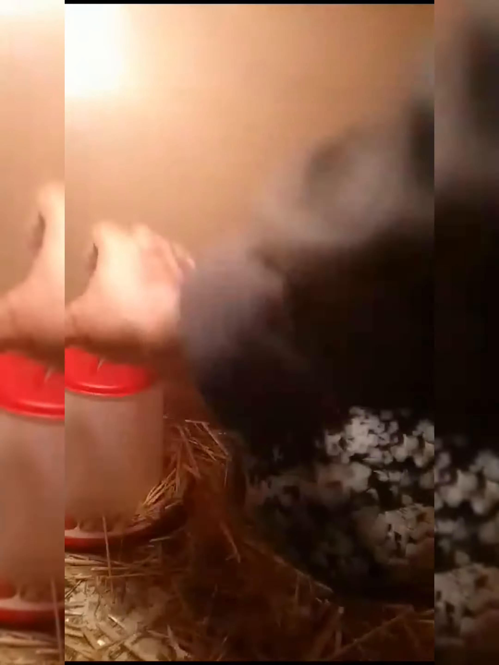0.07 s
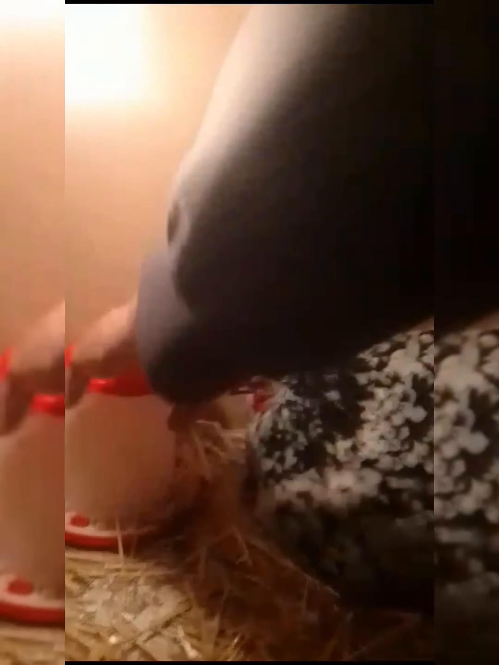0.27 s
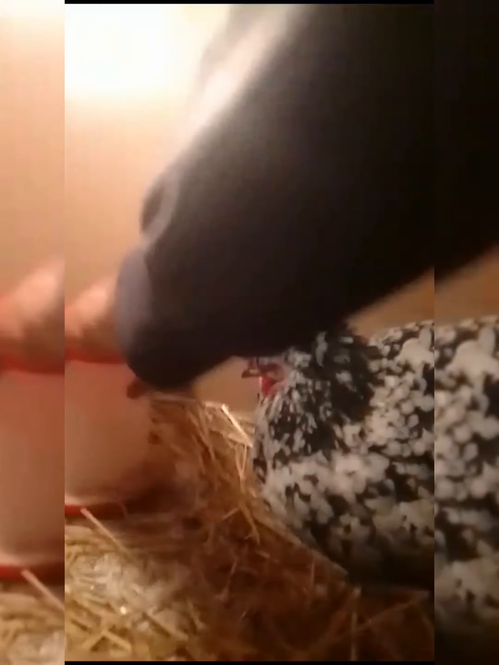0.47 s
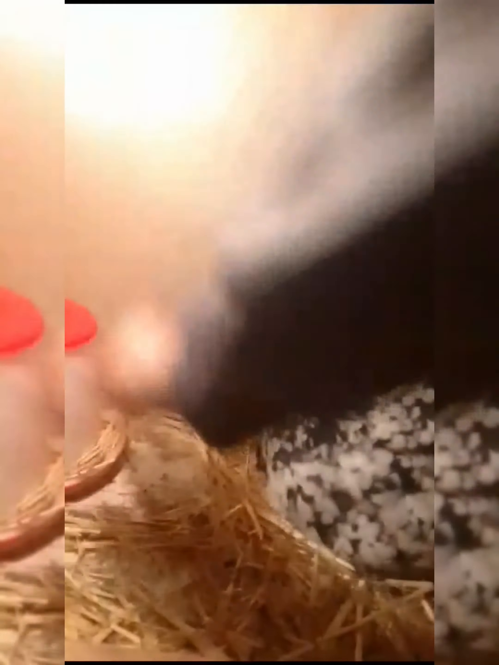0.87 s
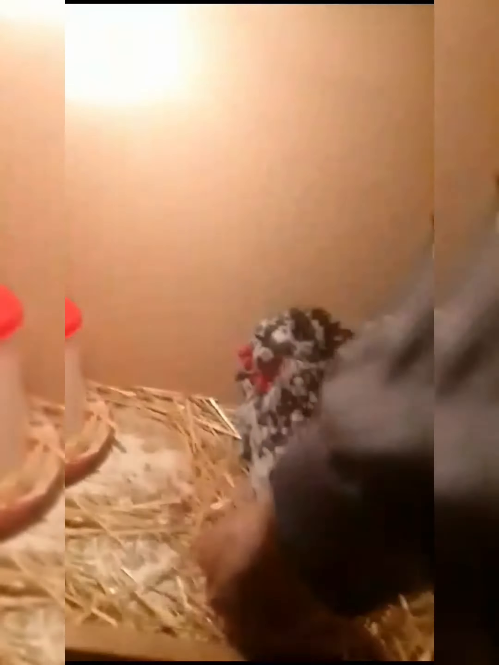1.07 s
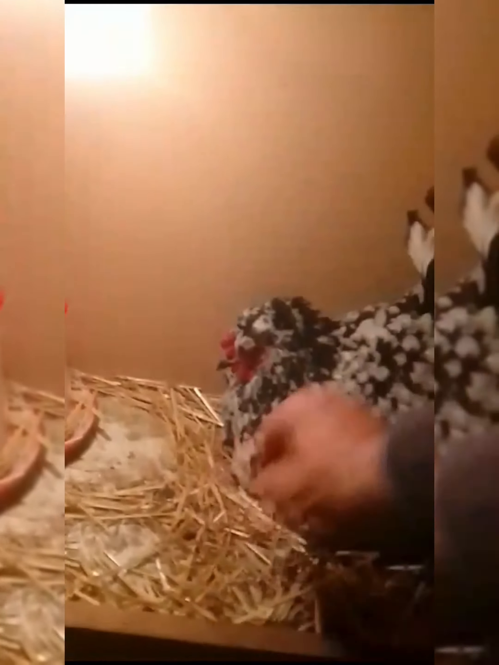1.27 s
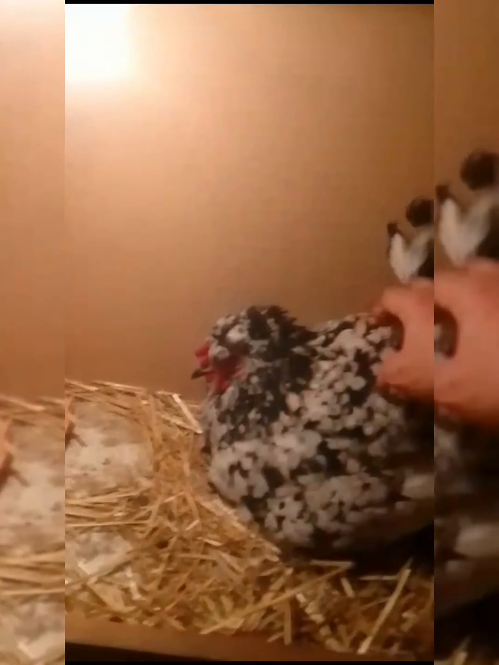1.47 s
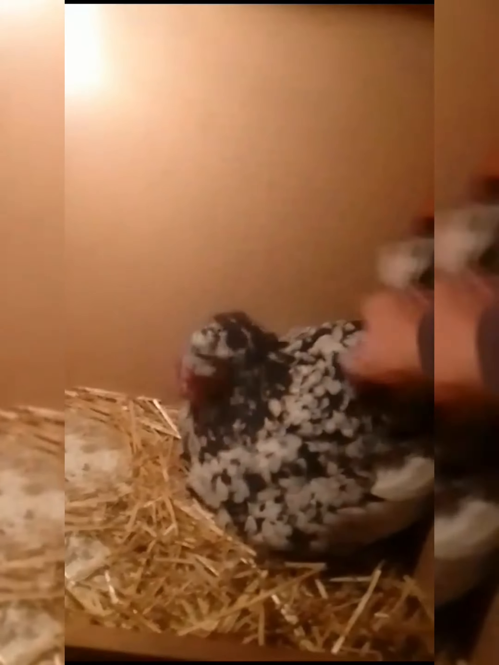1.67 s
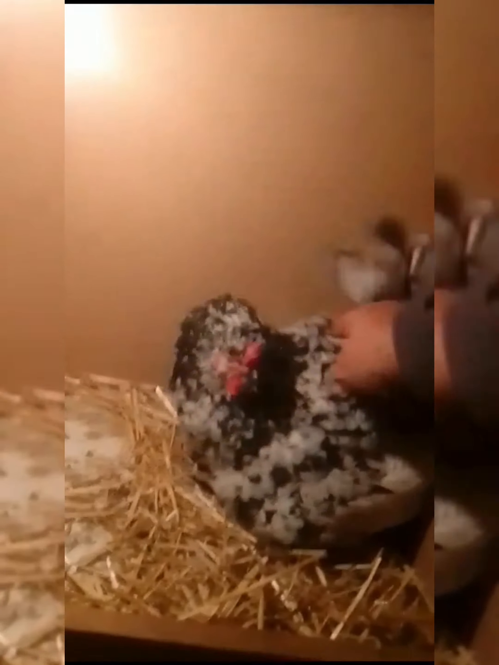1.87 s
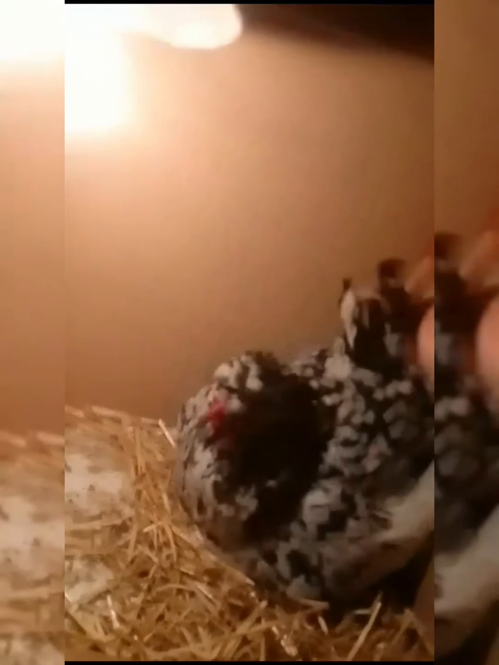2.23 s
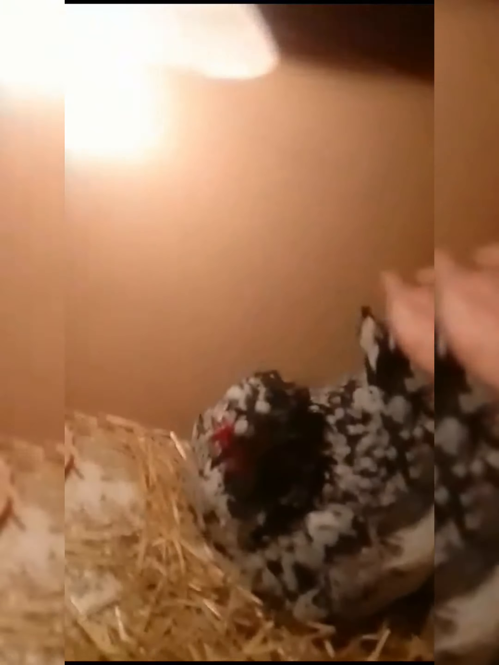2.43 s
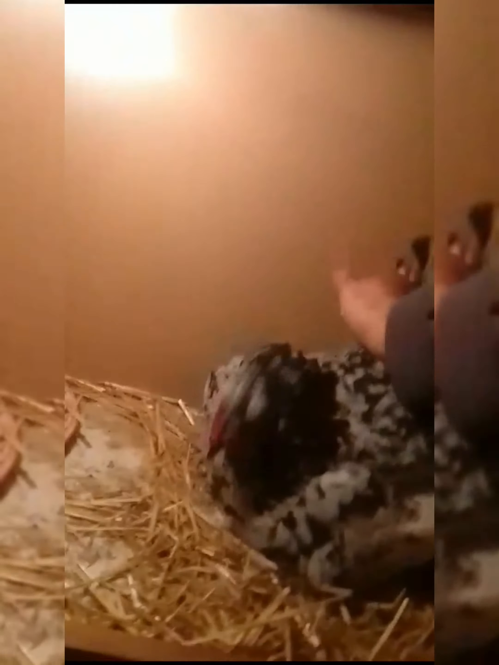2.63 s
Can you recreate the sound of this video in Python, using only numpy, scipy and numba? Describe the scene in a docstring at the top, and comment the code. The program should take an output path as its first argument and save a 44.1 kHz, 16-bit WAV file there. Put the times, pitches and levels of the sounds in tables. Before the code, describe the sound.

A hen gives two rattling growls and short, low clucks as a hand rustles and snaps the straw in her box. A sleeve rubs, a chick peeps faintly and something bumps the box, heard close in a quiet room.

```python
"""A broody hen growls at a hand in her straw-lined box: two rattling protests and short, low clucks,
made by pulses of her syrinx ringing her throat. Straw and feathers rustle under a rubbing sleeve,
stalks snap, a chick peeps twice and something bumps the box; the hen ends on two faint whines.
The box stands in a quiet room, heard close by through one small microphone."""
import sys
import numpy as np
from scipy import signal
from scipy.io import wavfile
from scipy.ndimage import uniform_filter1d
from numba import njit

SR = 44100
rng = np.random.default_rng(int(sys.argv[2]) if len(sys.argv) > 2 else 0)


def dump(signal):
    """Clip the signal to [-1, 1] and save it as 16-bit WAV at the path in sys.argv[1]."""
    limited = np.clip(np.atleast_2d(signal).T, -1, 1)
    pcm = np.round(limited * 32767).astype(np.int16)
    wavfile.write(sys.argv[1], SR, pcm)


N = 123479
T = np.arange(N) / SR
GROWL_BREATH = 0.67  # air noise relative to the syrinx pulses
# Spectrum of dry straw, rustling or cracking: frequency_hz, level_db
STRAW_SPECTRUM = [(1500, -22), (2500, -6), (4000, 12), (5200, -8), (6500, 13.5), (8000, -5), (10000, 12.5),
                  (13000, -18), (16000, -5)]


def from_db(db):
    """Decibels to gain."""
    return 10 ** (np.asarray(db) / 20)


def rms_one(x):
    """Scale to unit rms."""
    return x / np.sqrt(np.mean(x ** 2) + 1e-20)


def even(x):
    """Hold the rms at 1 over about one rattle (20 ms)."""
    return x / np.sqrt(uniform_filter1d(x ** 2, size=900) + 1e-12)


def in_time(rows):
    """Interpolate rows of (time_s, values...) to one curve per value."""
    times, *columns = np.transpose(rows)
    return [np.interp(T, times, column) for column in columns]


def arch(start_s, length_s):
    """Progress through a note from 0 to 1, and its rounded envelope."""
    progress = np.clip((T - start_s) / length_s, 0, 1)
    return progress, np.sqrt(4 * progress * (1 - progress))


def decay(age_s, t60_s):
    """Fall by 60 dB every t60_s."""
    return np.exp(-np.log(1000) * age_s / t60_s)


def drift(rate_hz):
    """Smooth random wander of rms 1, mostly slower than rate_hz."""
    step, settle = 40, 2000
    pole = np.exp(-2 * np.pi * rate_hz * step / SR)
    draws = rng.standard_normal(N // step + settle + 2)
    slow = signal.lfilter([1], [1, -2 * pole, pole * pole], draws)[settle:]
    return np.interp(np.arange(N) / step, np.arange(len(slow)), rms_one(slow))


def cut(x, hz, kind, order=2):
    """Butterworth filter."""
    return signal.sosfilt(signal.butter(order, hz, kind, fs=SR, output="sos"), x + 1e-18)


def resonate(x, hz, width_hz):
    """A resonance with gain 1 at its peak."""
    r = np.exp(-np.pi * width_hz / SR)
    feedback = [1, -2 * r * np.cos(2 * np.pi * hz / SR), r * r]
    return signal.lfilter(np.array([1, 0, -1]) * (1 - r * r) / 2, feedback, x + 1e-18)


@njit
def glide(x, hz, width_hz):
    """A resonance whose centre moves."""
    out, state = np.zeros(len(x)), 0j
    for i in range(len(x)):
        state = state * np.exp((2j * hz[i] - width_hz) * np.pi / SR) + x[i]
        out[i] = state.real
    return out


def formant(x, hz, width_hz):
    """A steep-sided throat resonance, still or moving, held at an even level."""
    ring = glide if np.ndim(hz) else resonate
    return even(ring(ring(x, hz, float(width_hz)), hz, 2.0 * width_hz))


def noise_band(hz, width_hz):
    """Steep-sided noise around one frequency; rms 1."""
    return rms_one(resonate(resonate(rng.standard_normal(N), hz, width_hz), hz, 2 * width_hz))


def white_pair():
    """Two unrelated white noises."""
    return rng.standard_normal((2, N))


def coloured(noises, spectrum, flicker_db=1.2):
    """Two noises dealt in turn to half-octave bands, each flickering around its level; rms 1."""
    out, edges_hz = 0, 31 * 2 ** np.arange(0, 9.1, .5)
    hz, db = np.transpose(spectrum)
    for k, (low, high) in enumerate(zip(edges_hz, edges_hz[1:])):
        band_db = np.interp(np.log(low * high) / 2, np.log(hz), db, left=-60)
        out += from_db(band_db + flicker_db * drift(22.4)) * cut(noises[k % 2], [low, high], "band")
    return rms_one(out)


def clicks(cycles):
    """One click per completed cycle."""
    return np.diff(np.floor(cycles), prepend=np.floor(cycles[0]))


def syrinx(pitch_hz=329.4, jitter=.3):
    """Ragged fast pulses of the hen's voice; rms 1."""
    return rms_one(clicks(np.cumsum(pitch_hz * np.exp(jitter * drift(200))) / SR))


def rattle(pulses, cycles, leak):
    """The rattle opens and closes on pulses and breath, letting some leak past when shut."""
    gate = leak + (1 + np.cos(2 * np.pi * cycles)) / 2
    return gate * (pulses + GROWL_BREATH * rng.standard_normal(N))


def growl(curve, timbre):
    """Low resonances sound as the rattle opens, upper ones half a cycle later."""
    # Harsh upper resonances: centre_hz, width_hz, level_db
    rasp_bands = [(1730, 280, 7.5), (2080, 210, -4.5), (2870, 130, 0.5), (4230, 610, 2), (4750, 67, -12.5),
                  (6860, 570, 4), (7960, 400, 4)]
    level_db, upper_hz, chest_db, rasp_db = in_time(curve)
    rattle_hz, low_hz, low_db, middle_hz, middle_db, jitter, leak, treble_db = timbre
    cycles = np.cumsum(rattle_hz * np.exp(jitter * drift(36.6))) / SR
    pulses = syrinx()
    opening = rattle(pulses, cycles, leak)
    closing = rattle(pulses, cycles + .5, leak)
    airy = rattle(.15 * pulses, cycles + .5, leak)
    low_loss_db = 0.58 * np.maximum(upper_hz - 844, 0)  # the lows thin out as the beak opens
    voice = (from_db(chest_db) * formant(opening, hz=227, width_hz=33)
             + from_db(low_db - low_loss_db) * formant(opening, low_hz, width_hz=120)
             + from_db(middle_db) * formant(closing, middle_hz, width_hz=150)
             + formant(closing, upper_hz, width_hz=150)
             + from_db(-12.5) * formant(closing, 1.224 * upper_hz, width_hz=116))  # beak
    rasp = sum(from_db(db + treble_db * (hz > 5500)) * formant(airy, hz, width)
               for hz, width, db in rasp_bands)
    voice = even(cut(voice, 1350, "low", order=6)) + from_db(rasp_db) * rms_one(rasp)
    sounding = (T > curve[0][0]) & (T < curve[-1][0])
    return voice * from_db(level_db) * uniform_filter1d(1.0 * sounding, size=300)


def growls():
    """The hen protests twice, the first time in two stretches with a short gap."""
    # One curve per stretch: time_s, level_db, upper_resonance_hz, chest_db, rasp_db
    curves = [
        [(.16, -49.5, 830, -3, -30), (.232, -57, 830, 2, -16), (.252, -30.5, 846, -21, -26),
         (.262, -49, 830, -20, -12), (.272, -32.5, 858, -13, -20), (.335, -36.5, 860, -2, -15),
         (.375, -31, 843, -8.5, -14), (.45, -30, 853, -24, -16), (.575, -32.5, 823, 5, -11.5),
         (.625, -48.5, 806, 10, -24)],
        [(.70, -49.5, 820, -11, -16), (.745, -36, 806, 0, -22), (.785, -46.5, 776, 12, -23)],
        [(1.655, -49.5, 840, -13, -22), (1.688, -48, 830, -29, -19), (1.75, -41, 785, 5, -15.5),
         (1.785, -35, 793, -1.5, -23.5), (1.88, -35.5, 806, -4.5, -20.5), (1.955, -34, 820, -31, -19.5),
         (1.98, -30, 786, -30, -14), (2.007, -35.5, 855, -21, -20), (2.013, -34, 800, -13, -7),
         (2.038, -27, 854, -30, -15), (2.06, -35, 1050, -17, -13), (2.078, -59, 1090, -10, -12)],
    ]
    # The throat in each stretch: rattle_hz, low_hz, low_db, middle_hz, middle_db,
    # jitter_ratio, leak_ratio, rasp_treble_db
    timbres = [(53.99, 452, 4.5, 610, 6, 0.079, 0.23, 4), (56, 470, 3.5, 560, -5, 0.079, 0.36, 0),
               (53.28, 400, -1.5, 701, -11.5, 0.135, 0.52, -2)]
    return sum(growl(curve, timbre) for curve, timbre in zip(curves, timbres))


def clucks(attack_s=0.0036, release_s=0.019, sag=0.27, jitter=0.067, breath=0.55):
    """A few pulses sagging in pitch ring the throat over a round chest note; the beak hisses thinly."""
    # Each cluck: start_s, length_s, level_db, pitch_hz, hiss_db, mouth_hz, brightness_db
    calls = [(0.204, 0.026, -29.5, 252.5, -33.5, 583, -2), (0.302, 0.013, -24, 265.4, -24.5, 587, -7),
             (0.921, 0.014, -34.5, 260, -30, 533, -1), (0.946, 0.0193, -29, 245.9, -20, 547, 6.5),
             (1.354, 0.026, -31, 242.6, -22.5, 487, -0.5), (1.679, 0.0093, -37, 270, -32, 530, -5),
             (1.708, 0.022, -30.5, 240.5, -24.5, 543, 2), (2.499, 0.012, -40.5, 254.3, -19, 850.4, 1.5)]
    # Throat resonances: centre_hz, width_hz, level_db
    throat = [(214, 57, 6), (380, 58, 7), (670, 66, 4.5), (848.6, 36, 4.5), (1093, 32, -3),
              (1229, 31, -3.5)]
    # Hiss at the beak: centre_hz, width_hz, level_db
    hiss_bands = [(4650, 250, 12.4), (6290, 53, 22.2), (7750, 160, 9.7)]
    out = np.zeros(N)
    for start_s, length_s, level_db, pitch_hz, hiss_db, mouth_hz, bright_db in calls:
        age = T - start_s
        push = np.clip(age / attack_s, 0, 1) * np.clip((length_s - age) / release_s + .5, 0, 1)
        progress = np.clip(age / length_s, 0, 1)
        pitch = pitch_hz * np.exp(jitter * drift(190) - sag * (progress - .5))
        cycles = np.cumsum(pitch * (age > 0)) / SR + .5
        pulses = (clicks(cycles) + breath * np.sqrt(pitch_hz / SR) * rng.standard_normal(N)) * push
        tract = sorted([*throat, (mouth_hz, 102, 7)])
        ringing = sum((-1) ** k * from_db(db + bright_db * (hz > 780)) * resonate(pulses, hz, width)
                      for k, (hz, width, db) in enumerate(tract))
        chest = from_db(-9) * rms_one(push * np.cos(2 * np.pi * cycles))
        voice = rms_one(cut(ringing, 1470, "low", order=4)) + chest
        voice = rms_one(cut(voice, 218, "high", order=4))
        air = push * rng.standard_normal(N)
        hiss = sum(from_db(db) * resonate(air, hz, width) for hz, width, db in hiss_bands)
        hiss = from_db(hiss_db) * rms_one(cut(hiss, 2500, "high"))
        gain = from_db(level_db) * np.sqrt(length_s / T[-1])  # level over the cluck's own length
        out += gain * (voice + hiss)
    return out


def whines(width_hz=180):
    """Faint husky notes through a closed beak."""
    # Each whine: start_s, length_s, level_db, pitch_hz
    notes = [(2.636, 0.034, -49.5, 804), (2.768, 0.059, -46.5, 790)]
    out = np.zeros(N)
    for start_s, length_s, level_db, hz in notes:
        husk = resonate(resonate(rng.standard_normal(N), hz, width_hz), hz, width_hz)
        out += from_db(level_db) * arch(start_s, length_s)[1] * even(husk)
    return out


def chick(sag=.1, jitter=.007, quaver_db=2.5, swell_db=1):
    """Each peep sags in pitch, then sweeps upward, quavering and losing its overtone."""
    # Each peep: start_s, length_s, level_db, pitch_hz, rise_ratio, turn_fraction
    peeps = [(0.951, 0.079, -43, 3014, 1.48, .62), (2.208, .05, -42, 2695, 1.55, 0.5)]
    out = np.zeros(N)
    for start_s, length_s, level_db, pitch_hz, rise, turn in peeps:
        progress, envelope = arch(start_s, length_s)
        risen = 1 / (1 + np.exp((turn - progress) / 0.06))
        pitch = pitch_hz * rise ** risen * (1 + sag * (1 - progress) ** 4)
        phase = 2 * np.pi * np.cumsum(pitch * (1 + jitter * drift(330))) / SR
        octave = from_db(-3.5 - 7 * risen ** 4 + quaver_db * drift(150)) * np.sin(2 * phase)
        tone = from_db(quaver_db * drift(150)) * np.sin(phase)
        out += from_db(level_db + swell_db * (progress - .5)) * envelope ** 2 * (tone + octave)
    return out


def snaps(knock_t60_s=0.045):
    """A bright crack and a woody knock for each breaking stalk."""
    # Each stalk: start_s, crack_db, knock_db, knock_hz, crack_t60_s
    stalks = [(0.308, -41.5, -42, 2290, 0.044), (.375, -36, -37.5, 2660, .04),
              (0.455, -37, -55, 2010, 0.045), (0.577, -34.5, -44, 1800, 0.042),
              (0.812, -38, -51, 1700, .04), (0.8952, -45, -47, 1670, .025),
              (1.0372, -37.5, -42.5, 1470, 0.038), (1.067, -33, -68, 2000, 0.012),
              (1.177, -58, -45.5, 1180, .035), (1.325, -70, -46.5, 633, .035),
              (1.51, -33.5, -38, 1250, 0.038), (1.602, -45, -63, 2000, .02), (1.658, -77, -47, 1310, .035),
              (1.794, -53, -40.5, 2060, .035), (2.094, -35, -68, 1990, 0.014),
              (2.099, -33, -32, 1570, 0.03), (2.4066, -46, -42.5, 1400, 0.042),
              (2.493, -51, -45.5, 2070, .035), (2.51, -39, -56, 1280, 0.034)]
    out, crackle = np.zeros(N), coloured(white_pair(), STRAW_SPECTRUM)
    for start_s, crack_db, knock_db, knock_hz, crack_t60_s in stalks:
        age = np.clip(T - start_s, 0, .3)
        crack = from_db(crack_db) * crackle * decay(age, crack_t60_s)
        knock = from_db(knock_db) * noise_band(knock_hz, width_hz=470) * decay(age, knock_t60_s)
        out += (T > start_s) * (crack + knock)
    return out


def bump(start_s=2.227, contact_s=0.00049, gain_db=-30):
    """A soft blow sets the box's panels ringing."""
    # Panel modes: frequency_hz, level_db, t60_s
    modes = [(128, -7.5, 0.33), (180, 1.5, 0.12), (240, 3.5, 0.12), (359, -2.5, 0.062), (533, -16, 0.11),
             (823, -15.5, 0.17), (1080, -16, 0.1)]
    age = np.maximum(T - start_s, 0)
    ringing = sum(from_db(db) * decay(age, t60) * np.sin(2 * np.pi * hz * age) for hz, db, t60 in modes)
    onset = 1 - np.exp(-age / contact_s)
    return from_db(gain_db) * cut(onset * ringing, 116, "high", order=4)


def straw(cracks_per_s=1100, spread_db=3, clump_db=.8):
    """Dense tiny cracks over the hiss of sliding straw and feathers; a quick sweep is crisper."""
    # Strength of the rustle: time_s, level_db
    rustle_curve = [(0, -53), (.07, -84), (.19, -74), (.29, -61.5), (.36, -53), (.465, -39.5),
                    (.505, -45.5), (.565, -39.5), (.61, -42), (.68, -44), (.735, -40), (.795, -53),
                    (.82, -43), (.93, -62), (1.03, -58.5), (1.075, -51), (1.11, -50), (1.2, -59.5),
                    (1.32, -73), (1.43, -78), (1.47, -57.5), (1.5, -60.5), (1.54, -53.5), (1.64, -60.5),
                    (1.74, -63), (1.81, -50), (2.0, -54), (2.13, -47.5), (2.195, -46.5), (2.235, -39),
                    (2.3, -48), (2.37, -56), (2.47, -64), (2.53, -50.5), (2.65, -54), (2.8, -52.5)]
    # The hand sweeping through dry stalks: start_s, length_s, level_db
    sweeps = [(1.031, 0.115, -45)]
    # Spectrum of the sweep: frequency_hz, level_db
    sweep_spectrum = [(5000, -35), (8000, 0), (11000, 11), (15000, -10)]
    sizes = from_db(spread_db * np.minimum(rng.exponential(1, (2, N)), 5)) * np.sign(white_pair())
    cracks = rms_one(sizes * (rng.random((2, N)) < cracks_per_s / SR))
    friction = cracks + white_pair()
    rustle_db = in_time(rustle_curve)[0] + clump_db * drift(110)
    rustle = from_db(rustle_db) * coloured(friction, STRAW_SPECTRUM)
    sweep_gain = sum(from_db(db) * arch(start, length)[1] ** 4 for start, length, db in sweeps)
    return rustle + sweep_gain * coloured(white_pair(), sweep_spectrum)


def sleeve():
    """Cloth rubs dully and scratches along the box."""
    # Strength of the rubbing: time_s, rub_db, scratch_db
    strokes = [(0, -59.5, -64.5), (.12, -62, -79), (.3, -63, -75), (.39, -41.5, -49.5), (.56, -41.5, -43.5),
               (.67, -44, -48.5), (.79, -52.5, -48.5), (.86, -50, -42.5), (.93, -45, -60),
               (1.1, -55.5, -58.5), (1.27, -57.5, -65.5), (1.45, -60.5, -64.5), (1.53, -52.5, -57),
               (1.63, -61.5, -61), (2.0, -53, -59), (2.14, -53.5, -49.5), (2.36, -57, -57), (2.6, -53, -56),
               (2.8, -51.5, -55.5)]
    # Spectra of the dull rub and of the scratch: frequency_hz, level_db
    rub_spectrum = [(70, -54), (120, -10), (220, 2.5), (330, 2.5), (500, -2.5), (800, -3), (1200, -14),
                    (2000, -30)]
    scratch_spectrum = [(700, 1.5), (1200, 1.5), (1750, 2.5), (2300, -0.5), (3000, -4), (4500, -39),
                        (7000, -13)]
    rub_db, scratch_db = in_time(strokes)
    rub = from_db(rub_db) * coloured(white_pair(), rub_spectrum, flicker_db=0.5)
    return rub + from_db(scratch_db) * coloured(white_pair(), scratch_spectrum, flicker_db=4)


def box_echo(x, delay_s=0.0037, t60_s=0.094, echo_db=-8.5):
    """The box's close walls add a short dense echo."""
    age = T[:SR // 4]
    tail = rng.standard_normal(len(age)) * decay(age, t60_s) * (age > delay_s)
    return x + from_db(echo_db) * signal.fftconvolve(x, tail / np.linalg.norm(tail))[:N]


def room_tone(noise_db=-58.5):
    """Quiet room noise with a faint hum."""
    # Narrow bands of the hum: centre_hz, width_hz, level_db
    hum_bands = [(120.6, 22, -67.5), (1802, 48, -71)]
    # Spectrum of the room noise: frequency_hz, level_db
    room_spectrum = [(30, 25), (70, -17), (120, -17.5), (230, 25), (450, -8.5), (850, -3.5), (1400, -21),
                     (3000, -49), (8000, -11), (16000, -52)]
    hum = sum(from_db(db) * noise_band(hz, width) for hz, width, db in hum_bands)
    return hum + from_db(noise_db) * coloured(white_pair(), room_spectrum, flicker_db=3)


def scene():
    """Hen, chick and straw in their box, close by and in mono."""
    hen = growls() + clucks() + whines()
    return (box_echo(hen + chick() + snaps()) + bump() + straw() + sleeve() + room_tone())[None]


def record(dry):
    """The small microphone loses the deep bass; the top is cut steeply."""
    low_cut_hz, high_cut_hz = 66, 15600
    top_cut = signal.ellip(10, .2, 70, high_cut_hz, fs=SR, output="sos")
    return signal.sosfilt(top_cut, cut(dry, low_cut_hz, "high", order=4))


dry = scene()
out = record(dry)
dump(out)
```